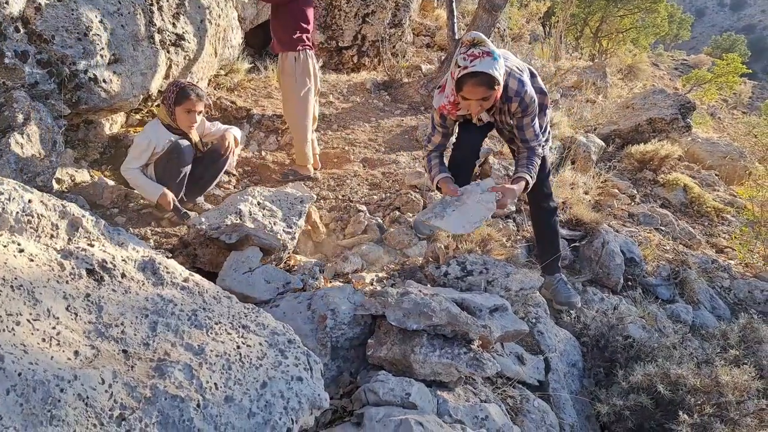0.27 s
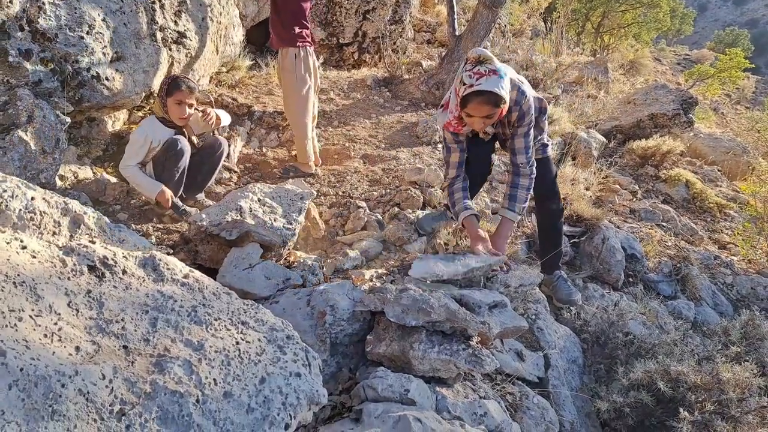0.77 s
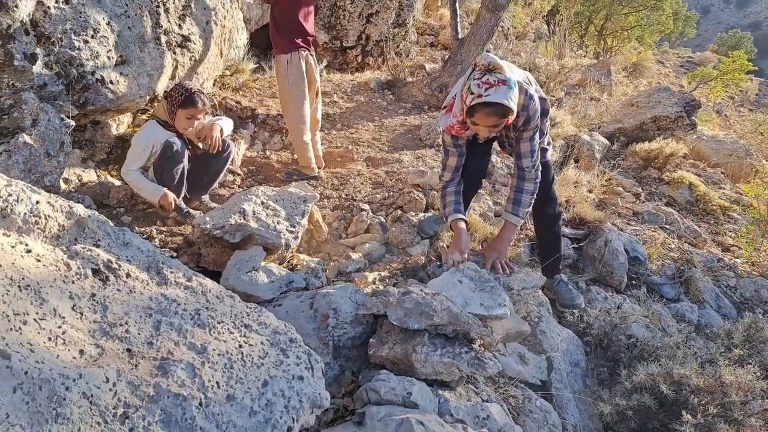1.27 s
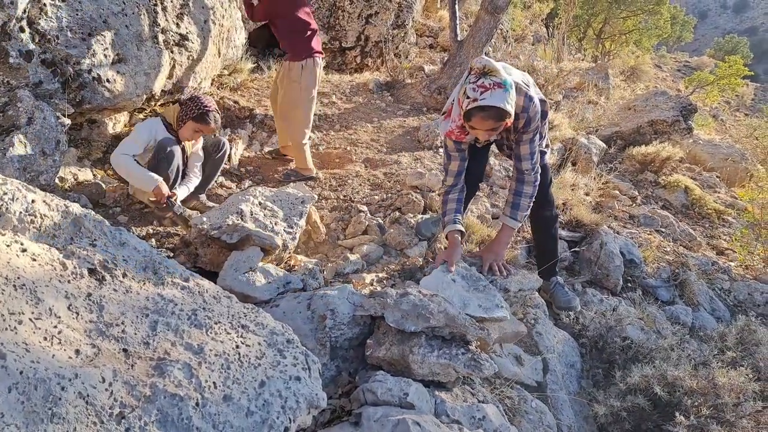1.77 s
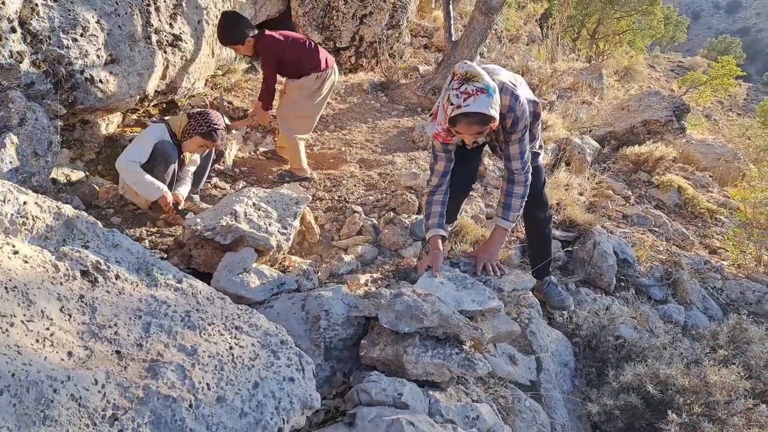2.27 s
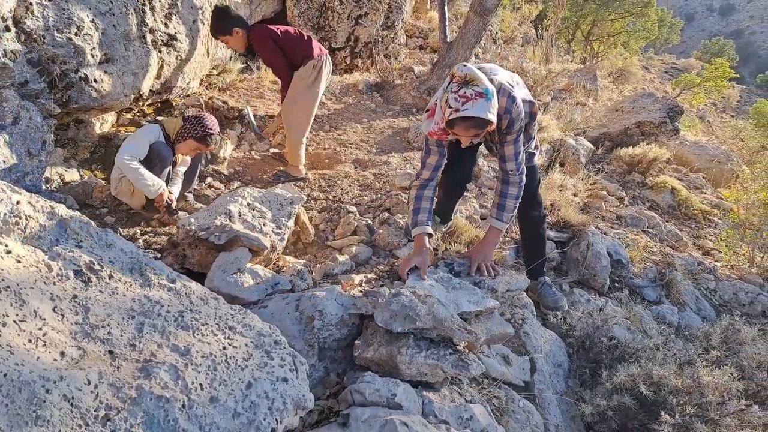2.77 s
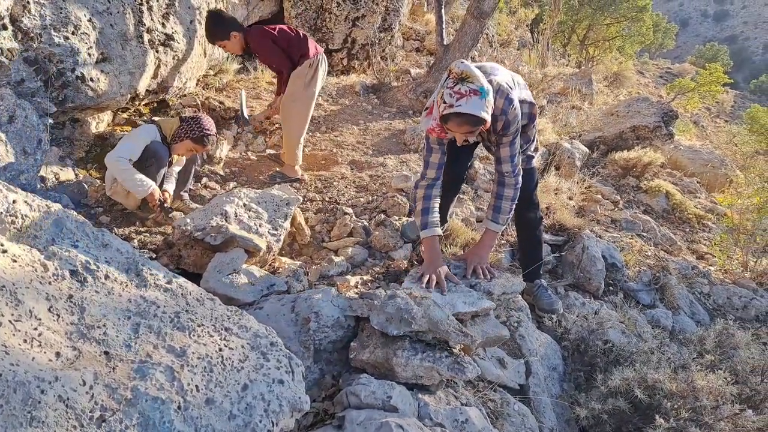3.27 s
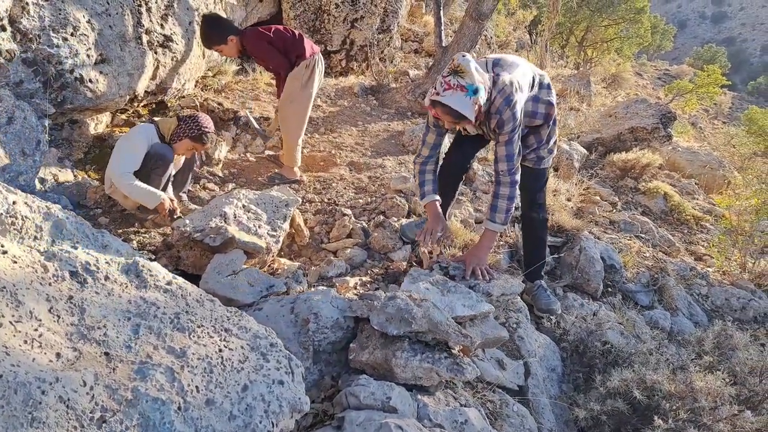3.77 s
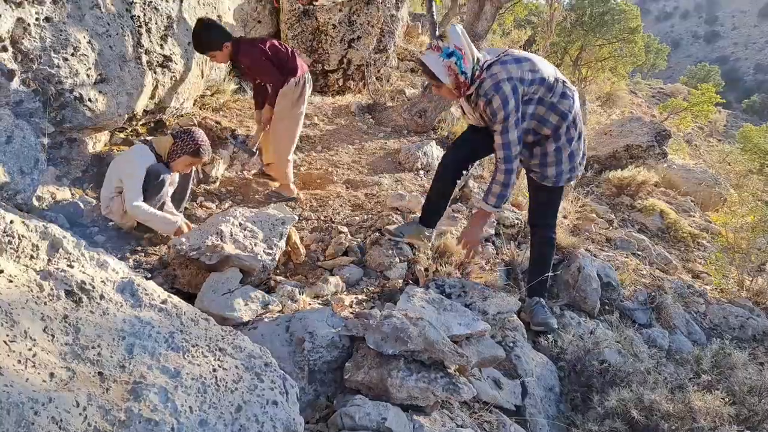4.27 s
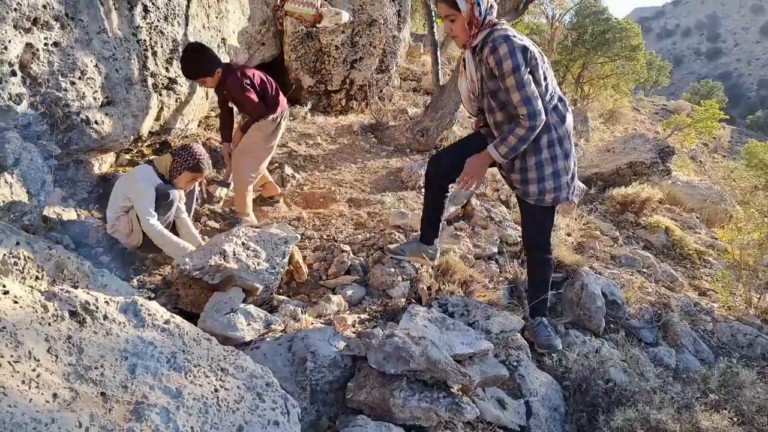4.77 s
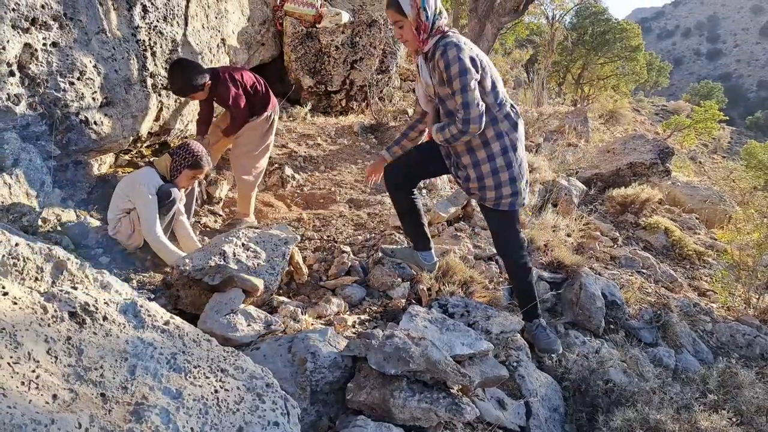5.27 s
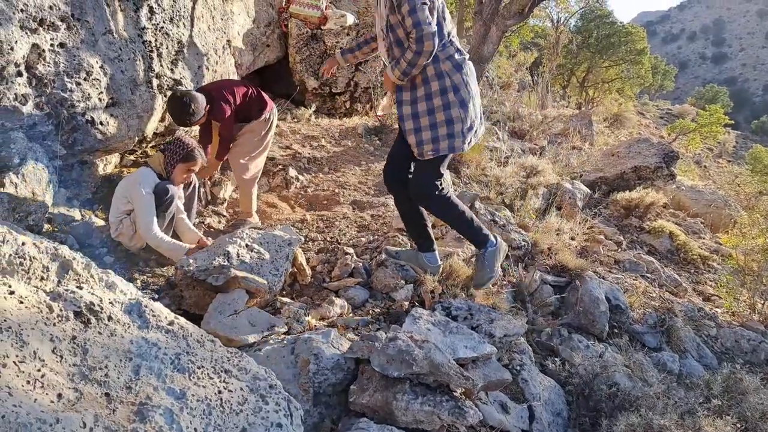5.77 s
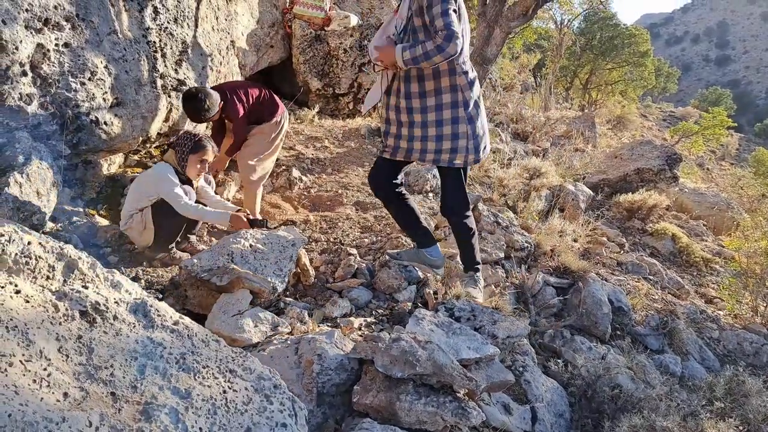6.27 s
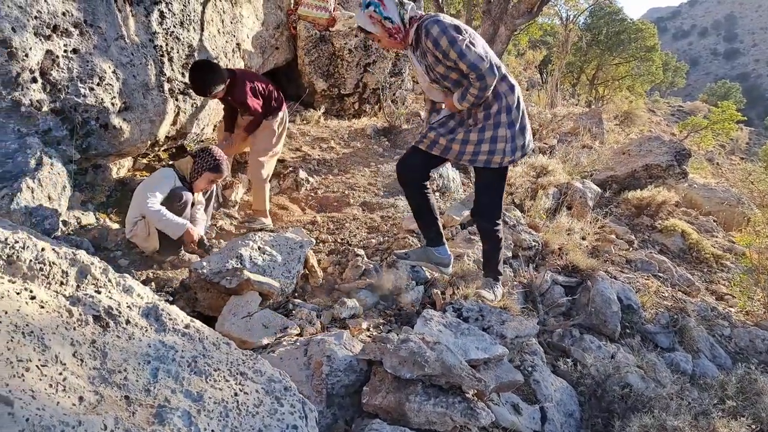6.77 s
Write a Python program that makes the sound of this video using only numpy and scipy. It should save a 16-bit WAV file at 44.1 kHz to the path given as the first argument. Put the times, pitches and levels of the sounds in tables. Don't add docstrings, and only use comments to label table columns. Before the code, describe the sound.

Soft gritty handling opens over low wind buffeting and a barely audible distant drone. A flat rock clanks onto other stones, ringing briefly like a plate before choking and rocking. A hard pebble blow follows, sharp and dry, then low stony dragging and small clinks. Later, footsteps crackle and crunch through crumbs and small stones. Near microphone, open outdoor air, only short scatter from rock faces.

```python
import sys
import numpy as np
from scipy import signal
from scipy.fft import rfft, irfft, next_fast_len
from scipy.io import wavfile
from scipy.ndimage import uniform_filter1d, map_coordinates

SR = 44100
rng = np.random.default_rng(int(sys.argv[2]) if len(sys.argv) > 2 else 0)


def wav_record(signal):
    frames = np.transpose(np.atleast_2d(signal))
    bounded = np.clip(frames, -1, 1)
    quanta = np.round(bounded * 32767).astype(np.int16)
    wavfile.write(sys.argv[1], SR, quanta)


def boost(x):
    u = np.asarray(x, float) / 20
    return 10 ** u


N = 309141
CLOCK = np.arange(N) / SR
OUT_OF_STEP = np.array([[1], [-1]])


def unit(x):
    return x / np.sqrt(np.mean(x ** 2) + 1e-20)


def along(points, hz):
    f, value = np.transpose(points)
    return np.interp(np.log(hz + 1), np.log(f + 1), value)


def curves(rows):
    s, *columns = np.transpose(rows)
    return [np.interp(CLOCK, s, column) for column in columns]


def wobble(rate):
    return map_coordinates(rng.standard_normal(int(N * rate / SR) + 4), [CLOCK * rate])


def decay(t, t60_s):
    return boost(-60 * t / t60_s)


def place(out, start_s, sound):
    start = round(start_s * SR)
    out[..., start:start + sound.shape[-1]] += sound


def filtered(x, response):
    m = next_fast_len(N + SR // 2)
    return irfft(rfft(x, m) * response(np.fft.rfftfreq(m, 1 / SR)), m)[..., :N]


def panned(x, db):
    return x * boost(np.reshape([db / 2, -db / 2], (2, -1)))


def strokes(rows, rest_db, steeper=1):
    gain = boost(rest_db)
    for s, db, swell, fade in rows:
        away = np.maximum((s - CLOCK) / swell, (CLOCK - s) / fade)
        gain = gain + boost(db - 20 * steeper * away)
    return gain


# frequency [Hz], left-right correlation [-1 to 1].
PORT_LIKENESS = [(60, -0.83), (180, 1), (550, 0.31), (1650, -0.0069), (4970, -0.24), (15000, 0.25)]


def gritty(spectrum, grain_db, grain_s):
    size = np.minimum(rng.exponential(1, N), 4)
    grains = boost(grain_db * size) * (rng.random(N) < .02)
    lumps = signal.lfilter([1], [1, -np.exp(-1 / (grain_s * SR))], grains)
    pair = (lumps + 1e-9) * rng.standard_normal((2, N))
    pair += 1.6 * np.mean(lumps) * rng.standard_normal((2, N))

    def mid_side(hz):
        turn = np.arccos(np.clip(along(PORT_LIKENESS, hz), -1, 1)) / 2
        return boost(along(spectrum, hz)) * [np.cos(turn), np.sin(turn)]

    mid, side = filtered(pair, mid_side)
    return unit(np.array([mid + side, mid - side]))


def gravel(count, centre_hz, cycles):
    when, where = rng.random(count), rng.random(count)
    size_db = rng.normal(0, 3, count)[:, None]
    hz = (centre_hz * np.exp(rng.normal(0, .5, count)))[:, None]
    t = np.arange(500) / SR
    rings = boost(size_db - 60 * t * hz / cycles) * np.sin(2 * np.pi * np.minimum(hz, 15000) * t)
    at = ((when * N).astype(int)[:, None] + np.arange(500)).ravel()
    sides = []
    for share in (np.sqrt(where), np.sqrt(1 - where)):
        sides.append(np.bincount(at, (rings * share[:, None]).ravel(), N + 700)[:N])
    return unit(np.array(sides))


def patchy(x, depth_db):
    z = signal.stft(x, nperseg=512)[2]
    field = uniform_filter1d(rng.standard_normal(z.shape[1:]), size=4, axis=0)
    field = uniform_filter1d(field, size=8, axis=1)
    return signal.istft(z * boost(depth_db * unit(field)), nperseg=512)[1][:, :N]


# frequency [Hz], level [dB rms].
DRONE_LINES = [(104, -77.5), (209, -75), (488, -76.5), (557, -76)]
# time [s], level [dB].
DRONE_UPPER_FADE = [(0, -1), (.5, 6.5), (2.4, 4.5), (3.6, -41), (7, 1)]


def drone():
    upper, out = curves(DRONE_UPPER_FADE)[0], 0
    for hz, db in DRONE_LINES:
        level = boost(db + 1.0 + 0.59 * wobble(6.8) + upper * (hz > 300))
        out = out + level * np.sin(2 * np.pi * hz * CLOCK + 1.1 * wobble(31))
    return out


# peak [s], crunch [dB], scrape over it [dB], swell [s], fade [s].
HANDS = [(0.032, -50, -2, 0.13, 0.085), (.3, -62, -10.5, 0.43, 0.27), (.648, -57, -6.5, 0.1, 0.19),
         (1.749, -62.5, 9, 0.096, 0.075), (1.832, -54.5, -2.5, 0.021, 0.041),
         (1.987, -66, 6.5, 0.063, 0.08), (2.078, -54, -2.5, 0.021, 0.12), (2.209, -57.5, 4.5, 0.039, 0.13),
         (2.597, -58.5, 8.5, 0.16, 0.1), (2.779, -61.5, 3, 0.021, 0.055), (3.039, -70, -5, 0.033, 0.27),
         (3.36, -71.5, -7, .01, 0.085), (3.443, -73, 16.5, 0.02, 0.1)]
# peak [s], crunch [dB], scrape over it [dB], swell [s], fade [s].
FEET = [(3.764, -62.5, -12.5, 0.33, 0.46), (4.121, -57, 3.5, 0.14, 0.098), (4.2, -64, 3.5, 0.104, 0.055),
        (4.336, -55, -5, 0.056, 0.226), (4.62, -65, 2.5, 0.1, 0.19), (5.07, -67.5, -7.5, 0.95, 0.32),
        (5.241, -55, -2.5, 0.1632, 0.25), (5.55, -58.5, -7, 0.37, 0.13), (5.6, -63.5, -10.5, .1, 0.019),
        (5.685, -59, -7, 0.032, .04), (5.758, -51.5, -5, 0.006, 0.12), (5.86, -58.5, -7.5, .15, 0.11),
        (5.982, -47, -19.5, 0.015, 0.11), (6.043, -37.5, -6.5, 0.076, 0.11), (6.135, -52, -3, .06, 0.26),
        (6.235, -55.5, 0.5, 0.29, 0.026), (6.349, -50.5, 1, .2, 0.062), (6.554, -48.5, -2.5, 0.15, 0.073),
        (6.681, -52, -5, .2, 0.19), (6.97, -61.5, -1.5, 0.41, 0.32)]


def scraping():
    rows = [(s, db + over, swell, fade) for s, db, over, swell, fade in HANDS + FEET]
    return strokes(rows, rest_db=-88, steeper=1.35)


# frequency [Hz], level [dB].
SLOPE_SPECTRUM = [(41, -28.5), (70, -3.5), (318, -2), (371, -3), (554, -4.5), (1000, -10), (1300, -37),
                  (2200, -120)]


def murmur():
    gain = boost(-71 + 0.17 * curves(DRONE_UPPER_FADE)[0])
    gain = gain + boost(-9.5) * np.minimum(scraping(), boost(-54.5))
    return boost(wobble(2.9)) * gain * gritty(SLOPE_SPECTRUM, grain_db=0.0, grain_s=0.011)


# frequency [Hz], level [dB].
BUFFET_SPECTRUM = [(8.8, -42.5), (22, -12), (64, 2), (160, -13.5), (210, -42.5), (350, -120)]
# peak [s], level [dB], swell [s], fade [s].
GUST_SWELLS = [
    (.31, -53.5, 0.1, 0.9),
    (1.2, -59.5, 0.2, 0.22),
    (1.64, -59, 0.15, 0.26),
    (2.58, -59.5, 0.12, 0.16),
    (3.4, -68, 0.55, 0.47),
    (4.8, -59, 0.094, 0.11),
    (5.76, -65, .06, 0.23),
    (6.01, -64, 0.056, .2),
    (6.97, -59.5, 0.14, 0.27),
]


def wind():
    rumble = filtered(rng.standard_normal((3, N)), lambda hz: boost(along(BUFFET_SPECTRUM, hz)))
    lumps = boost(4.2 * wobble(9)) * (0.95 * rumble[2] + rumble[:2])
    return strokes(GUST_SWELLS, rest_db=-79) * unit(lumps)


# frequency [Hz], level [dB].
CRUMB_SPECTRUM = [(1470, -35), (2500, -6), (3650, -9), (4160, -0.5), (5010, 0), (6410, -3), (7530, -5.5),
                  (8140, -3), (9280, -13.5), (12200, -5), (13400, -6), (15800, -15.5)]
# frequency [Hz], level [dB].
STONE_SPECTRUM = [(290, -28.5), (500, -10.5), (934, -14), (1200, 2.5), (1510, -11.5), (1790, 1),
                  (4500, -20.5), (5850, -33.5), (9900, -120)]
# time [s], left-right level difference [dB].
WHERE_WORKING = [(0.0, -5.5), (0.64, -6), (4.53, -6), (7.01, -4)]


def soil():
    presses = [(s, db, swell, fade) for s, db, over, swell, fade in HANDS + FEET]
    crumb_gain = strokes(presses, rest_db=-85) * boost(1.89 + 1.085 * wobble(30))
    covered = strokes(SLAB_DRAGS, -90) > boost(-65)
    stone_gain = scraping() * boost(-14 * covered) * boost(-0.17 + 1.5 * wobble(28))
    fine = gritty(CRUMB_SPECTRUM, grain_db=5.0, grain_s=0.0021)
    fine += 0.24 * gravel(count=4000, centre_hz=6040, cycles=730)
    coarse = gritty(STONE_SPECTRUM, grain_db=9.0, grain_s=0.0035)
    coarse += 0.42 * gravel(count=3000, centre_hz=1740, cycles=7.2)
    pan = curves(WHERE_WORKING)[0]
    return patchy(panned(crumb_gain * fine, pan) + panned(stone_gain * coarse, 0.25 * pan), depth_db=2.5)


# start [s], peak [dB], pitch [Hz].
GRIT_SNAPS = [(0.118, -38.5, 4800), (0.2192, -38, 6700), (0.315, -39.5, 5980), (0.614, -42, 5530),
              (0.631, -37, 4300), (1.2189, -40.5, 6000), (1.731, -51.5, 4970), (1.2875, -53.5, 6420),
              (1.8181, -47, 4250), (2.368, -42, 5630), (2.8853, -55.5, 7050), (3.354, -52, 3530),
              (2.562, -41, 4540), (2.597, -50, 5000), (2.622, -47.5, 5500), (6.02, -31.5, 8200),
              (6.075, -34, 4900), (3.683, -47, 4060), (3.859, -46, 5250), (4.016, -42, 4200),
              (3.751, -47, 4370), (4.3345, -35, 4300), (4.352, -37, 4270), (4.6093, -36.5, 6170),
              (4.7685, -43, 5600), (4.858, -33.5, 12000), (4.9759, -45, 7600), (5.29, -37, 6740),
              (5.563, -36, 12100), (5.7546, -38, 4650), (5.975, -51, 5180), (5.994, -31, 5240),
              (6.04, -42, 4840), (6.06, -33, 4280), (6.2045, -34, 5130), (6.3462, -34, 6850),
              (6.359, -32, 7200), (6.3882, -39, 7150), (6.6713, -33, 12700)]
# start [s], peak [dB], pitch [Hz].
STONE_TICKS = [(1.7308, -44, 1280), (1.7419, -40.5, 2680), (1.8331, -38.5, 2415), (2.0768, -37, 2553),
               (2.1079, -50, 3230), (2.222, -44.5, 1770), (2.2387, -39.5, 2150), (2.4161, -54.5, 1300),
               (2.499, -45, 1350), (2.513, -42.5, 1680), (2.5425, -39, 1490), (2.546, -41, 900),
               (2.5552, -47.5, 3300), (2.599, -40.5, 1500), (2.7092, -48, 2770), (2.7749, -48, 1960),
               (3.0067, -53, 2700), (3.77, -52, 2390), (3.839, -58, 2658), (3.886, -52, 2650),
               (4.0572, -46, 1780), (6.057, -38, 1810), (6.066, -32, 1120), (6.078, -34.5, 1100),
               (6.135, -30, 1140), (6.186, -42, 1250), (6.3078, -34, 1180), (6.349, -41, 1200),
               (6.553, -30.5, 3440), (6.947, -43, 1960)]


def snaps():
    out, t = np.zeros((2, N + SR)), np.arange(SR // 10) / SR
    for rows, t60_s in [(STONE_TICKS, .015), (GRIT_SNAPS, .013)]:
        for s, db, hz in rows:
            b, a = signal.iirpeak(min(hz, 14000), 1.5, SR)
            burst = unit(signal.lfilter(b, a, rng.standard_normal((2, len(t)))))
            sound = .55 * decay(t, t60_s) * np.sin(2 * np.pi * hz * t)
            sound = sound + .5 * decay(t, .012) * (burst[0] + .6 * burst)
            place(out, s, boost(db - 0.5) * sound * (1 - np.exp(-t / 0.0007)))
    return panned(out[:, :N], curves(WHERE_WORKING)[0])


# start [s], peak [dB], left-right level difference [dB].
PEBBLE_BLOWS = [
    (2.133, -8.5, -2.5),
    (2.2367, -41.5, -5.5),
]
# frequency [Hz], level [dB], t60 [s].
PEBBLE_MODES = [(1225, 4, 0.024), (1776, -5, .08), (1722, -11, .07), (2290, 0, .024), (2519, -8, 0.04),
                (3200, 3.5, 0.055), (4040, -9, 0.06), (5050, -3, 0.022), (6231, -18, 0.17),
                (6874, -10, 0.055), (9948, -22.5, 0.036), (11390, -11, 0.085), (12900, -3, .016),
                (13900, -6, .014)]
# frequency [Hz], level [dB], t60 [s].
PEBBLE_GROUND = [(68, -16, .14), (105, -12, .14), (139, -7, 0.11), (206, -7, .08), (270, 3, 0.028),
                 (460, -2, 0.035), (650, -1, .025)]


def pebble():
    out, t = np.zeros((2, N)), np.arange(SR // 2) / SR
    ring, boom = 0, 0
    for hz, db, t60 in PEBBLE_MODES:
        ring = ring + boost(db - 7.5) * decay(t, t60) * np.sin(2 * np.pi * hz * t + .7 * OUT_OF_STEP)
    for hz, db, t60 in PEBBLE_GROUND:
        boom = boom + boost(db - 7.0) * decay(t, t60) * np.sin(2 * np.pi * hz * t)
    noise = signal.lfilter([1], [1, -.75], rng.standard_normal((3, len(t))))
    crack_and_dust = boost(-1) * decay(t, 0.014) + boost(-30.0) * decay(t, 0.15)
    crack = crack_and_dust * (1.2 * noise[2] + .5 * noise[:2])
    onset = 1 - np.exp(-(t / .002) ** 2)
    for s, db, pan in PEBBLE_BLOWS:
        place(out, s, boost(db) * (panned(ring + crack, pan) + panned(boom, 1.5)) * onset)
    return out


# start [s], peak
# [dB], pitch [Hz], t60 [s].
GROUND_THUDS = [(.827, -42, 700, .04), (.83, -50, 250, .06), (0.8562, -19, 900, 0.022),
                (.858, -38, 270, .11), (0.87, -29, 450, 0.02), (0.882, -28, 750, 0.025),
                (0.919, -38, 450, 0.013), (0.945, -33, 380, 0.015), (0.964, -30, 600, 0.016),
                (1.011, -40, 400, 0.013), (1.035, -48, 350, .013), (1.166, -40, 350, 0.015),
                (1.203, -37, 760, 0.016), (1.21, -50, 90, .08), (1.283, -52, 420, .02),
                (1.305, -53, 300, .03), (1.599, -45.5, 62.9, 0.031), (2.42, -54, 215, .08),
                (2.503, -42, 254, 0.04), (2.542, -43, 330, 0.02), (2.567, -45, 150, .04),
                (2.599, -40.5, 120, 0.051), (2.675, -52, 200, .05), (2.79, -50, 181.4, 0.099),
                (3.442, -48.5, 167, 0.038), (1.453, -54, 700, .025), (3.21, -56, 300, .06),
                (3.075, -53, 260, .05), (3.495, -42, 560, 0.03), (3.52, -52, 280, .15),
                (4.328, -54, 118, 0.059), (4.764, -50, 69.9, 0.075), (4.772, -58, 320, .04),
                (5.2, -54, 330, .13), (5.25, -56, 400, 0.07), (5.757, -40, 150, 0.06),
                (5.76, -45, 380, .05), (6.946, -50, 570, .02), (5.772, -43, 95, 0.13),
                (6.018, -44, 60.7, 0.052), (6.939, -42, 61, 0.083)]


def thuds():
    out, t = np.zeros(N + SR), np.arange(SR // 4) / SR
    for s, db, hz, t60 in GROUND_THUDS:
        puff = unit(signal.lfilter(*signal.butter(2, 2 * hz, fs=SR), rng.standard_normal(len(t))))
        swing = np.sin(2 * np.pi * hz * t * (1 - 1.6 * t)) + 0.27 * puff
        place(out, s, boost(db + 5.0) * decay(t, t60) * swing * (1 - np.exp(-t * hz * 4)))
    return out[:N]


# peak [s], level [dB], swell [s], fade [s].
SLAB_DRAGS = [
    (.88, -51, .02, .2),
    (1.2, -62, .6, .045),
    (2.505, -51.5, .08, .15),
    (2.615, -49, .18, .2),
    (3.015, -62, .012, .15),
    (3.1, -58, .1, .05),
]
# frequency [Hz], width [Hz], level [dB].
DRAG_RESONANCES = [(199, 44, -2.5), (435, 76, -7), (710, 100, -1.5), (907, 67, -7.5), (1265, 120, -8),
                   (1750, 100, -10), (1960, 38, -11), (2700, 370, -16), (5084, 70, -15), (6440, 60, -17.5),
                   (1506, 830, -15)]


def drag():
    slips = (rng.random((2, N)) < .03) * boost(rng.normal(0, 3.5, N)) * rng.standard_normal(N)
    slips = unit(slips)

    def body(f):
        total = 0
        for k, (centre, width, db) in enumerate(DRAG_RESONANCES):
            loss = 1j * f * width
            total = total + (-1) ** k * boost(db) * loss / (centre * centre - f * f + loss)
        return total

    push = patchy(slips[0] + 1.4 * slips, depth_db=4)
    return filtered(strokes(SLAB_DRAGS, -87) * push, body) / np.std(filtered(push[0], body))


# start [s], level [dB], pitch [Hz], t60 [s].
RUBBED_MODES = [(0.859, -48, 2660, 0.033), (1.009, -39, 1080, 0.23), (1.06, -52, 1900, 0.18),
                (1.169, -35.5, 2696, 0.099), (1.22, -44.5, 2640, 0.071), (2.443, -57, 1936, 0.32),
                (2.476, -50, 1926, 0.18), (2.5, -59, 2680, 0.23), (2.568, -50, 2690, 0.2),
                (2.572, -54, 1700, .15), (2.577, -42, 917, .08), (2.615, -46, 650, 0.17),
                (2.632, -44, 922, 0.14), (2.668, -51.5, 1780, 0.12), (2.705, -46.5, 660, 0.078),
                (2.707, -49.5, 2740, 0.041), (2.736, -51, 850, 0.083), (2.706, -50, 4360, 0.045),
                (2.503, -53, 6440, 0.073), (2.615, -48, 2690, 0.11), (2.545, -52, 5600, 0.1),
                (2.46, -61.5, 3650, .15), (3.004, -57, 1080, 0.078), (3.02, -61, 2700, .07),
                (3.042, -63, 750, 0.07), (3.068, -51, 1340, .06), (3.072, -57.5, 2700, .08),
                (3.21, -58, 1100, 0.1), (3.498, -56, 2700, 0.045), (3.522, -61, 2400, .05),
                (3.59, -65, 555, .2), (3.441, -54, 1470, 0.078), (3.5, -58.5, 1110, 0.25),
                (3.441, -57, 2640, 0.12), (3.748, -56.5, 2404, 0.046), (4.011, -43.5, 2380, 0.05),
                (5.19, -56, 2395, 0.19), (5.24, -53.5, 2330, 0.13), (.28, -67, 1263, .3),
                (.355, -66.5, 1260, .4), (.37, -70, 2690, .2), (.95, -46, 2680, .12), (.9, -48, 2670, .2),
                (1.085, -54.5, 2685, 0.44), (1.62, -60, 2680, .12), (1.012, -55, 4640, 0.31),
                (1.09, -56.5, 4000, 0.32), (3.441, -52, 1800, .08), (1.72, -54, 870, .08),
                (1.586, -66.5, 1090, .5)]


def rubbing():
    out, t = np.zeros(N), np.arange(SR // 4) / SR
    for s, db, hz, t60 in RUBBED_MODES:
        place(out, s, boost(db) * decay(t, t60) * np.sin(2 * np.pi * hz * t) * (1 - np.exp(-t / .007)))
    return panned(boost(3 * wobble(110)) * out, -4.5)


# start [s], level [dB].
SHIMMER_BLOWS = [
    (0.8284, -44.5),
    (0.856, -48),
    (0.8824, -39),
    (.921, -55),
    (0.946, -51),
    (.9647, -53),
    (1.032, -53),
    (1.093, -58),
    (1.166, -60),
]


def shimmer(count, low_hz, high_hz):
    out, t = np.zeros((2, N)), np.arange(SR // 6) / SR
    octaves = np.log2(high_hz / low_hz) * rng.random((count, 1))
    level = boost(-7 * octaves) * decay(t * (1 + .4 * octaves), .11)
    rings = level * np.sin(2 * np.pi * low_hz * 2 ** octaves * t)
    for s, db in SHIMMER_BLOWS:
        mix = rng.standard_normal((2, count)) @ rings / np.sqrt(count)
        place(out, s, boost(db) * mix * (1 - np.exp(-t / .001)))
    return out


# start [s], ring [dB], spot along [0-1], spot across [0-1], crack [dB].
SLAB_CONTACTS = [(0.8275, -33, .47, .31, -27), (0.8565, -8.3, .478, .885, -20),
                 (0.8822, -12, .44, .53, -18), (0.9652, -38, .27, .4, -42.5), (1.0126, -54, .5, .52, -50.5),
                 (1.048, -55, .6, .5, -60), (1.0894, -55.9, .735, .01, -54), (1.1274, -54, .37, .185, -61),
                 (1.1662, -47, .48, .76, -45), (1.2037, -53, .25, .74, -40), (1.4535, -58, .23, .4, -43),
                 (1.5444, -70.9, .99, .83, -76), (1.6244, -63, .31, .225, -70),
                 (2.4394, -58.4, .31, .99, -54), (2.6144, -52, .1, .9, -50),
                 (3.4381, -47.8, .425, .825, -36), (3.496, -49, .45, .255, -37)]
# start [s], ring [dB], along [0-1], across [0-1], crack [dB].
SLAB_CLINKS = [(0.826, -45, .8, .61, -48), (0.8565, -52, .41, .31, -56), (0.8814, -23, .56, .245, -41),
               (0.921, -52.1, .47, .585, -53), (0.9464, -55.4, .315, .805, -58),
               (0.9647, -49, .74, .44, -52.5), (1.0124, -56.9, .7, .77, -54), (1.0498, -60, .805, .35, -47),
               (1.0954, -60.8, .145, .23, -67), (1.1657, -51.1, .76, .625, -65),
               (1.9697, -53.8, .12, .55, -61), (2.7041, -68, .79, .22, -63)]
# frequency [Hz], t60 [s], left-right difference [dB], share of stiffening.
SLAB_LOW = [(1055, 0.34, 2.5, 2.01), (1246, 0.26, -2.5, 1), (1922, 0.19, 3, .9), (2660, 0.13, -6, 0.5)]
# frequency [Hz], t60 [s], left-right difference [dB], share of stiffening.
SLAB_BRIGHT = [(3558, .11, -4.5, .6), (4300, .15, -5.5, .1), (5050, .075, -3, 0.54), (5593, .14, -2, 0.056)]
LOW_NODE_LINES = [(1, 0), (2, 0), (0, 2), (1, 1)]
BRIGHT_NODE_LINES = [(2, 0), (1, 1), (0, 1), (0, 2)]
# time [s], damping factor.
SLAB_DAMPING = [(.85, 1.2), (.857, 3.6), (.864, .4), (.879, .3), (.8815, 9), (.883, 3), (.891, 3),
                (.894, .8), (.97, .85), (.99, 1.5), (1.008, 1.5), (1.011, 25), (1.0135, 1.3), (1.197, 1.3),
                (1.2, 30), (1.2035, 1.5), (3, 2.2)]


def slab():
    lands_s, stiffens, settle_s = .872, .021, .12
    stiff = stiffens * (1 - np.exp(-np.maximum(CLOCK - lands_s, 0) / settle_s))
    creep = np.cumsum(stiff) / SR
    age = np.cumsum(curves(SLAB_DAMPING)[0]) / SR
    out, t = np.zeros((2, N)), np.arange(SR // 3) / SR
    twin = [(4640, .17, -2, .2)]
    low = (SLAB_CONTACTS, SLAB_LOW, LOW_NODE_LINES, 1.2, .8)
    bright = (SLAB_CLINKS, SLAB_BRIGHT + twin, BRIGHT_NODE_LINES, 3, .6)
    for contacts, modes, nodes, flicker_db, dull in (low, bright):
        swings = []
        for hz, t60, pan, share in modes:
            lead = .42 * (hz > 1100) * OUT_OF_STEP
            swing = np.sin(2 * np.pi * hz * (CLOCK + share * creep) + lead)
            swings.append(boost(flicker_db * wobble(55)) * panned(swing, pan))
        for s, ring_db, x, y, crack_db in contacts:
            levels = []
            for m, n in nodes:
                shape = abs(np.cos(np.pi * m * x) * np.cos(np.pi * n * y))
                levels.append(ring_db + 20 * np.log10(shape + .01))
            span = slice(round(s * SR), round(s * SR) + len(t))
            aged = age[span] - age[span][0]
            noise = rng.standard_normal((2, len(t)))
            crack = unit(signal.lfilter([1], np.convolve([1, -dull], [1, -dull]), noise))
            sound = boost(crack_db - 10) * decay(t, .012) * (crack[0] + .6 * crack)
            for mode, db, swing in zip(modes, levels + [levels[1] - 1.0], swings):
                sound += boost(db + 0.77) * decay(aged, mode[1]) * swing[:, span]
            rise_s = .00022 * boost(-.35 * (max(levels) + 10))
            out[:, span] += sound * (1 - np.exp(-t / rise_s)) ** 2
    return out


# frequency [Hz], t60 [s].
ROCK_SCATTER = [(200, 0.028), (2000, 0.17), (12000, 0.037)]


def rocks(x):
    noise = rng.standard_normal((2, SR // 2))
    hz, t, z = signal.stft(.6 * noise + .8 * noise[0], SR, nperseg=256)
    tail = signal.istft(z * decay(t, along(ROCK_SCATTER, hz)[:, None]), SR, nperseg=256)[1]
    tail = tail / np.linalg.norm(tail, axis=1)[:, None]
    late = np.pad(x, ((0, 0), (200, 0)))
    return signal.fftconvolve(late, tail, axes=1)[:, :N]


# frequency [Hz], level [dB].
MICROPHONE_TONE = [(7000, 1), (9500, -5), (12000, -2), (15500, -6.5)]


def scene():
    hits = slab() + thuds() + rubbing() + pebble() + snaps() + drag()
    hits = filtered(hits, lambda hz: boost(along(MICROPHONE_TONE, hz)))
    hits = signal.lfilter(*signal.butter(2, 50, "high", fs=SR), hits)
    air = wind() + murmur() + drone()
    return hits + boost(-14.0) * rocks(hits) + soil() + air + 2 * shimmer(count=110, low_hz=4220, high_hz=14800)


def low_pass(x):
    return signal.sosfilt(signal.butter(12, 16470, fs=SR, output="sos"), x)


def record(dry):
    held = dry / (1 + np.abs(dry / .98) ** 8) ** (1 / 8)
    mix = filtered(held, lambda hz: hz < 15830)
    return low_pass(mix)


dry = scene()
out = record(dry)
wav_record(out)
```